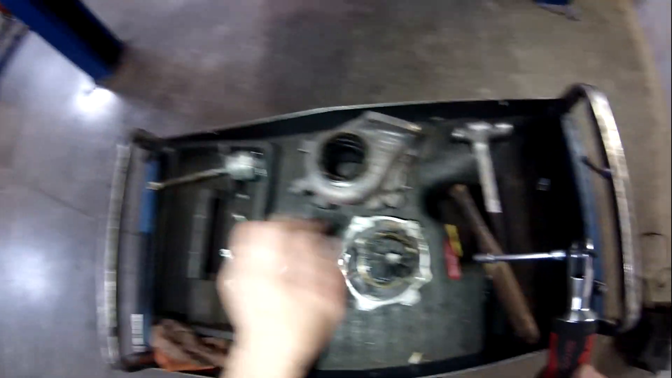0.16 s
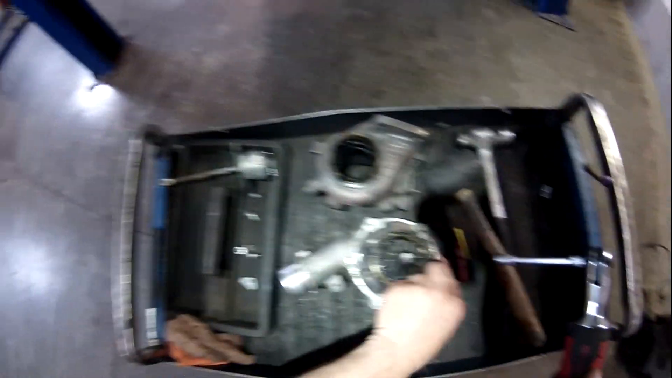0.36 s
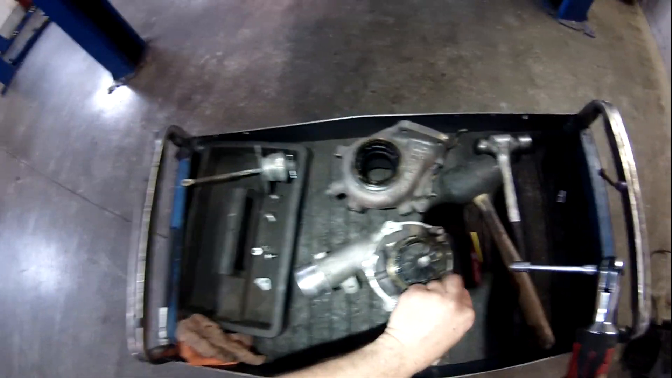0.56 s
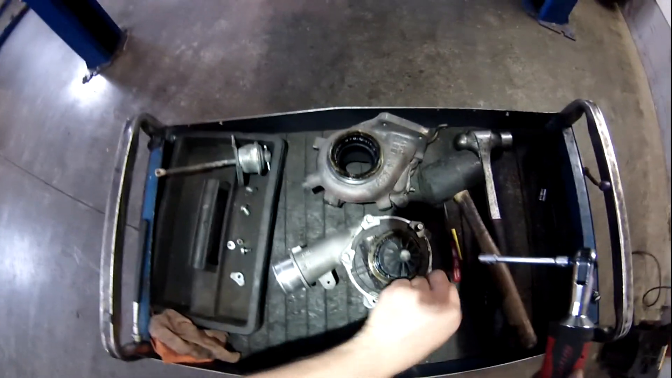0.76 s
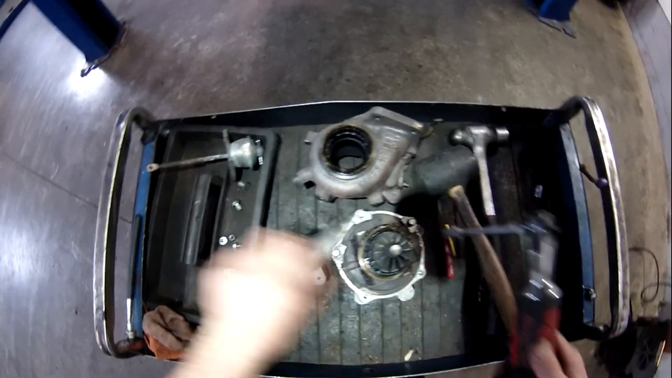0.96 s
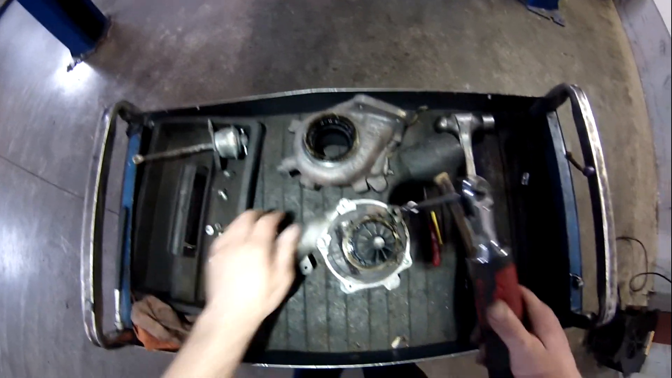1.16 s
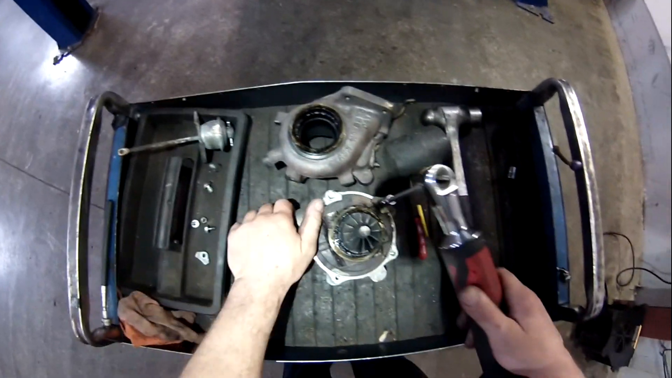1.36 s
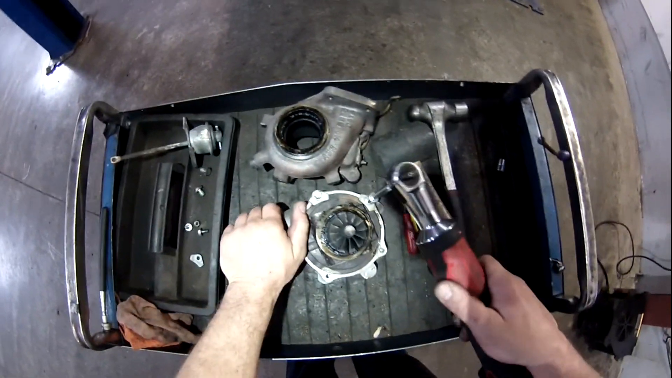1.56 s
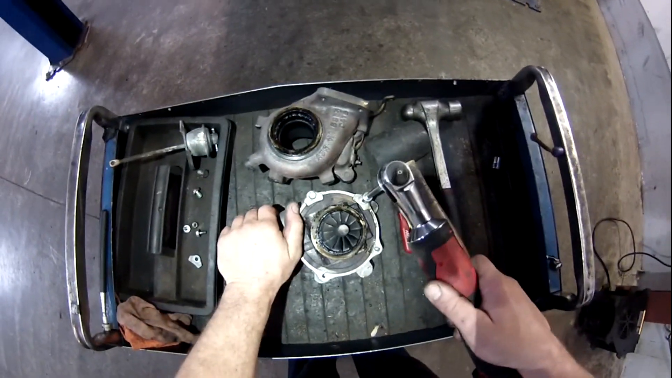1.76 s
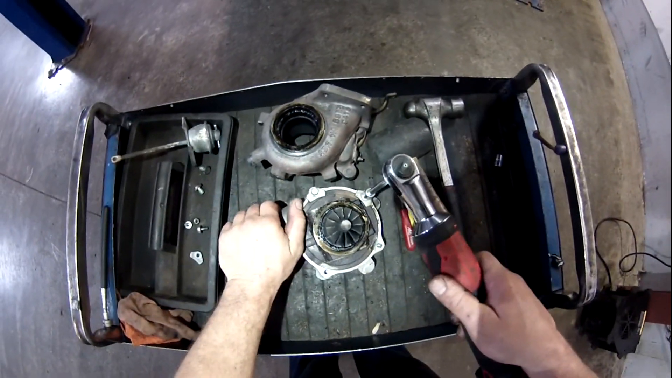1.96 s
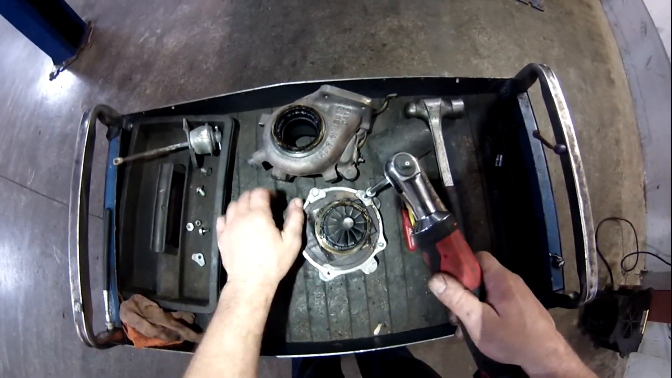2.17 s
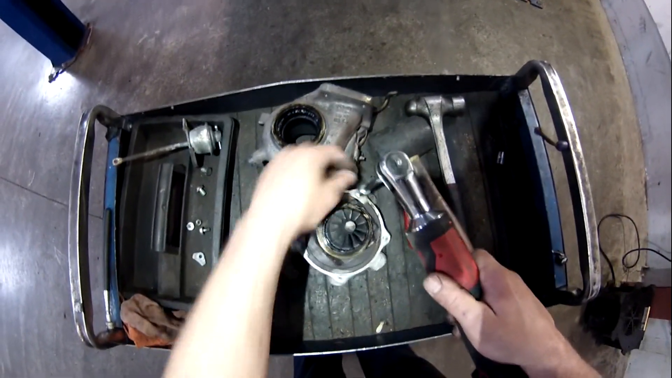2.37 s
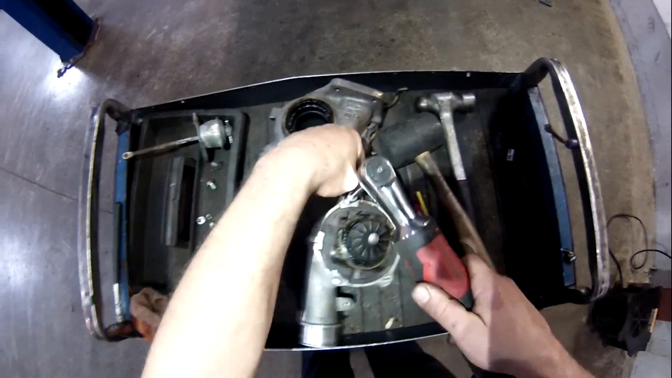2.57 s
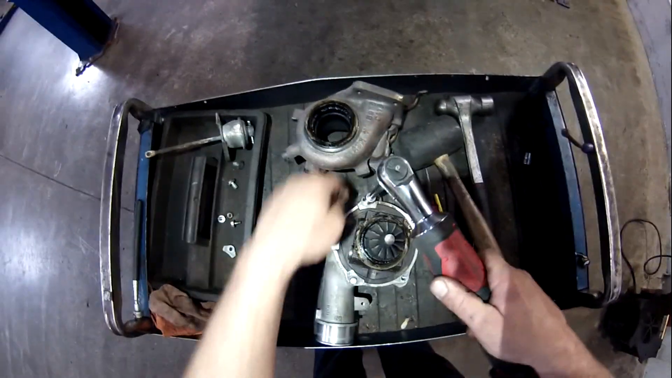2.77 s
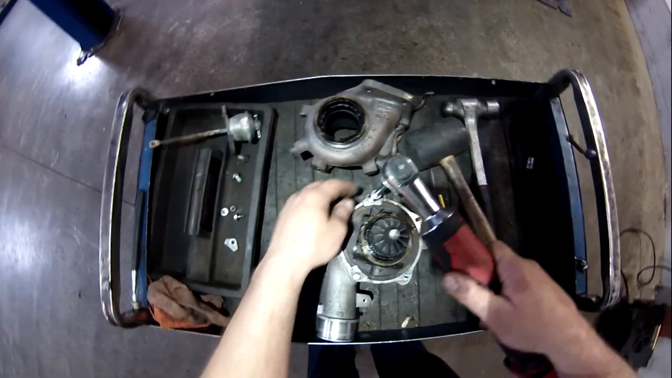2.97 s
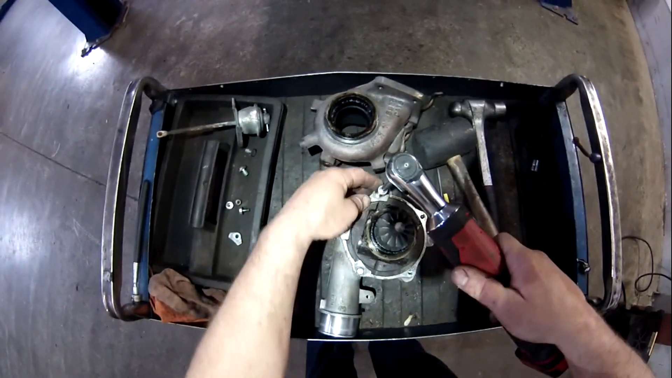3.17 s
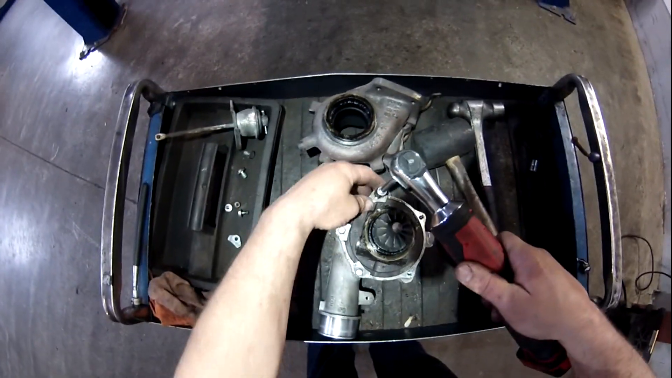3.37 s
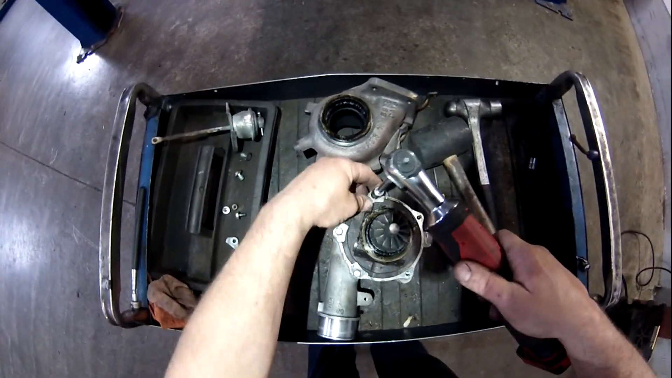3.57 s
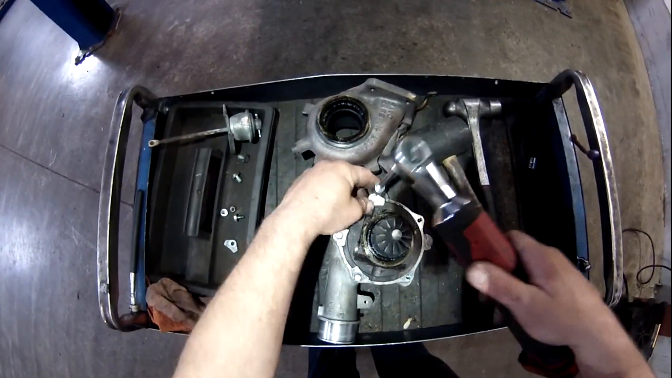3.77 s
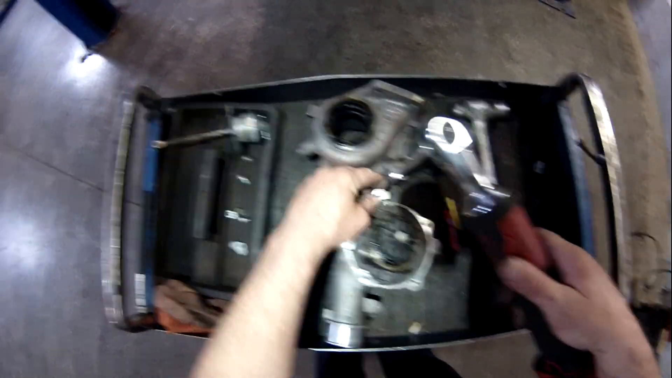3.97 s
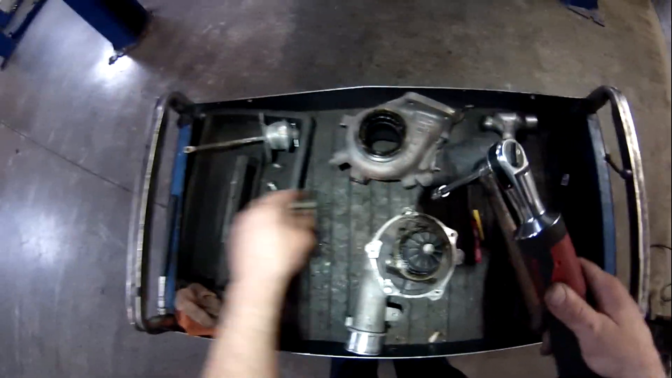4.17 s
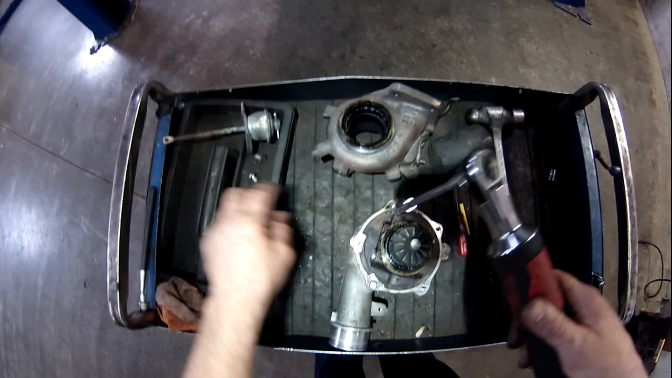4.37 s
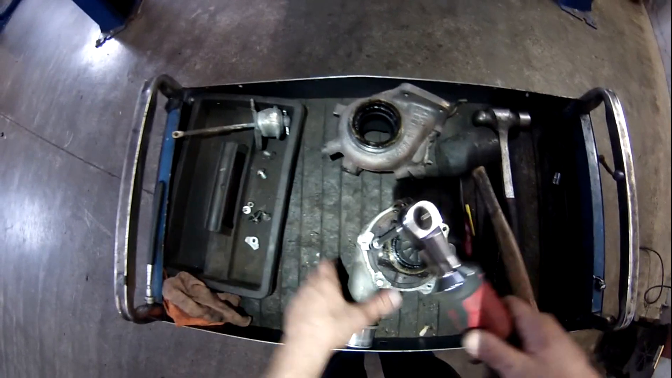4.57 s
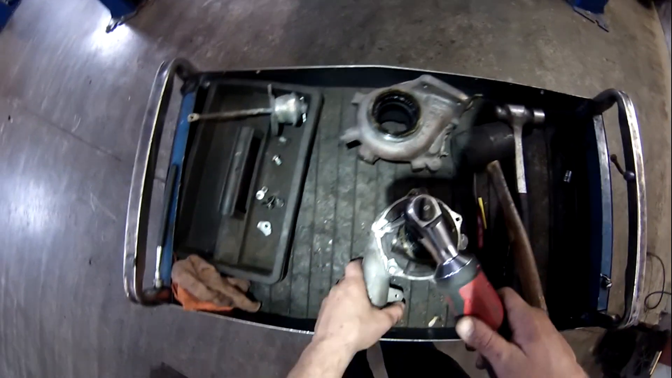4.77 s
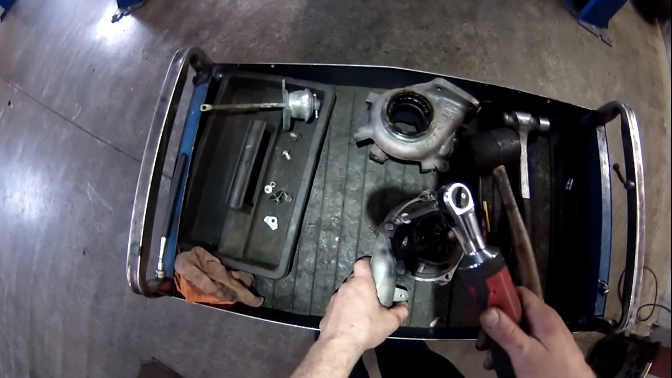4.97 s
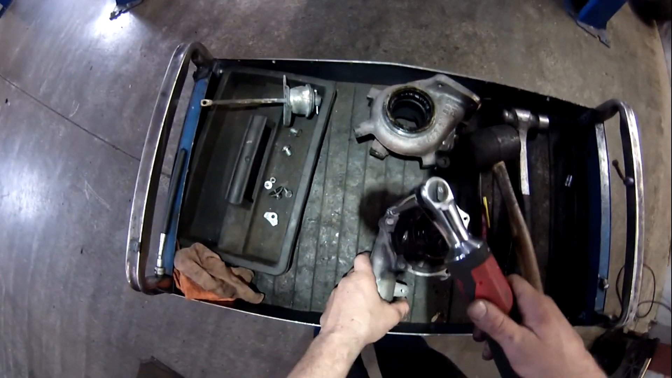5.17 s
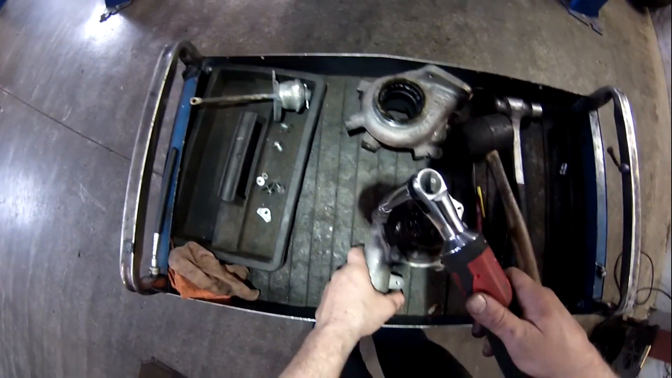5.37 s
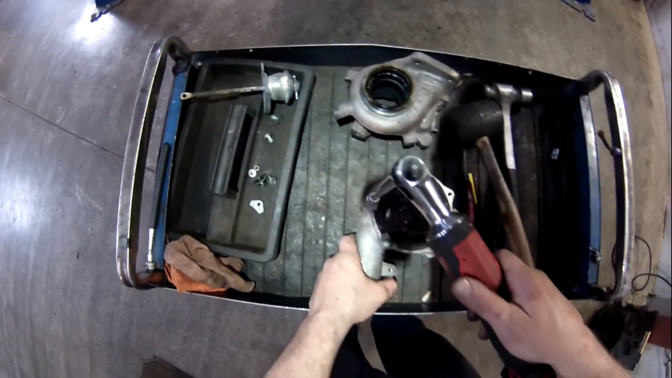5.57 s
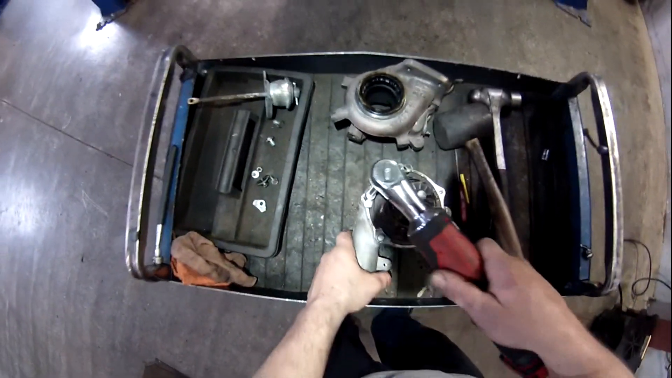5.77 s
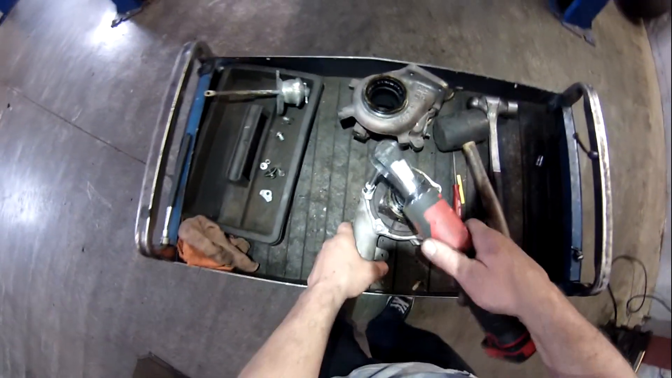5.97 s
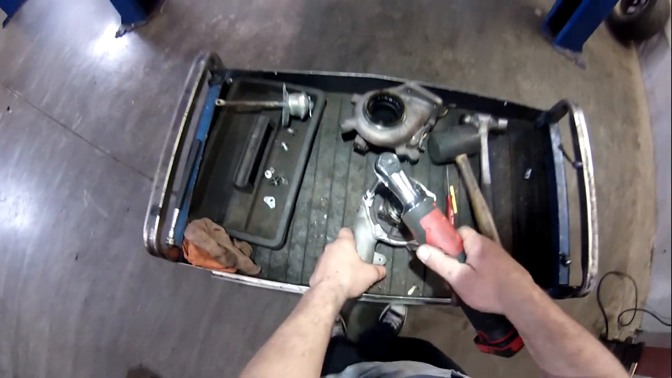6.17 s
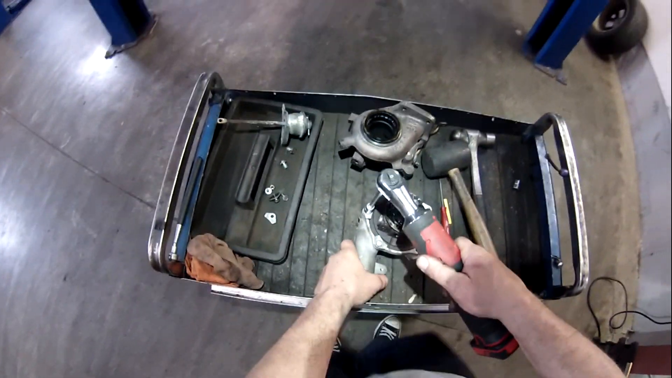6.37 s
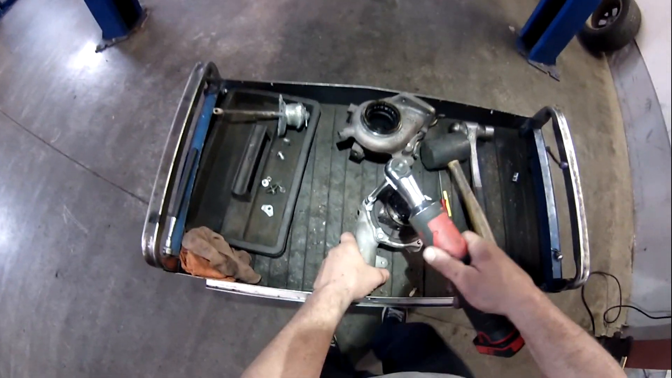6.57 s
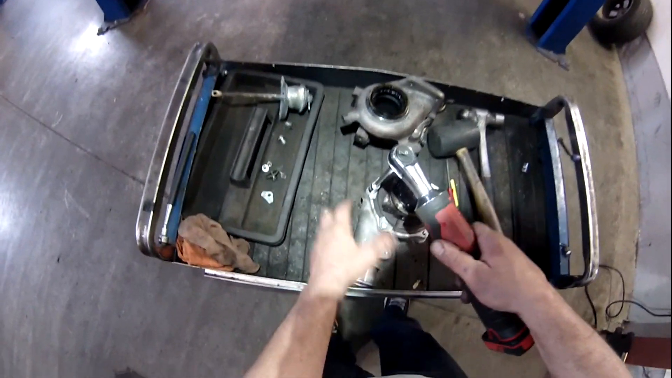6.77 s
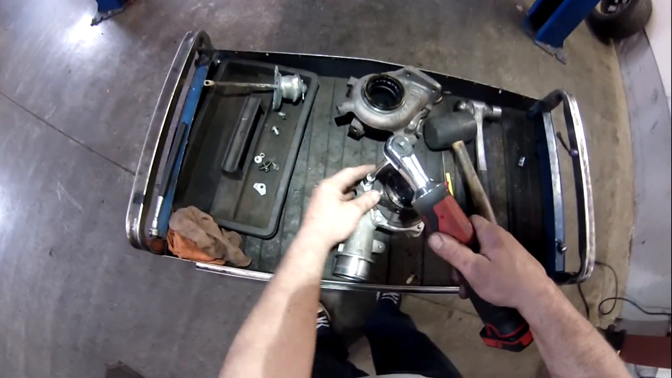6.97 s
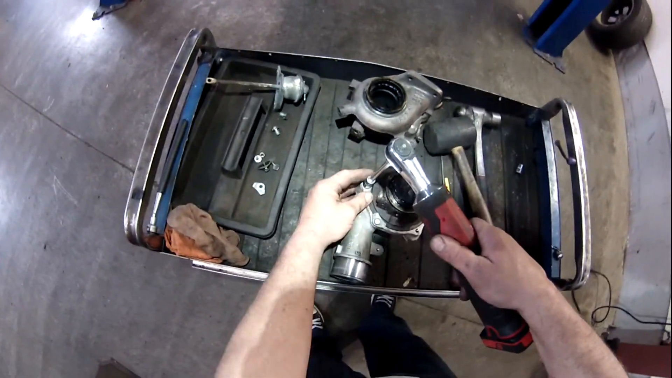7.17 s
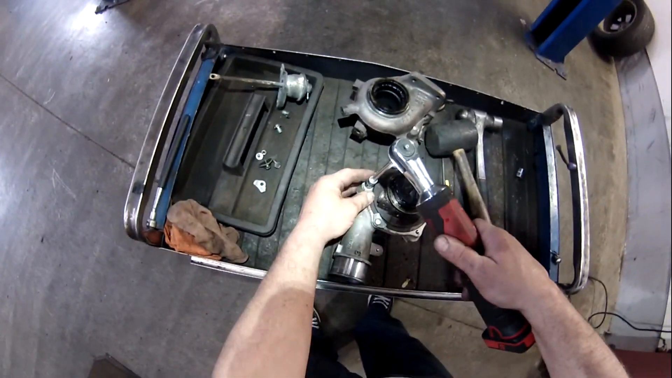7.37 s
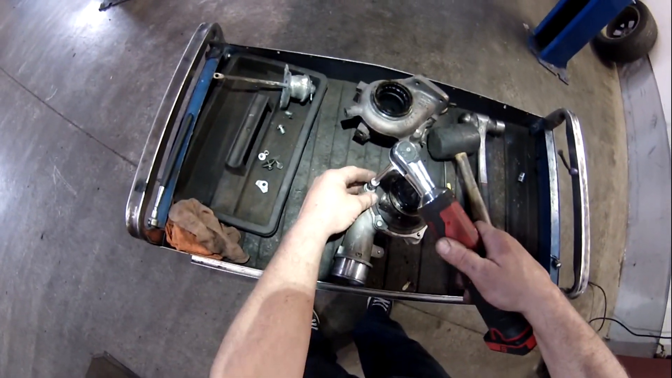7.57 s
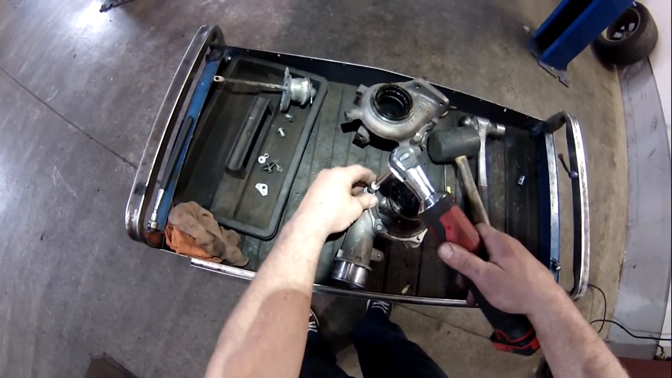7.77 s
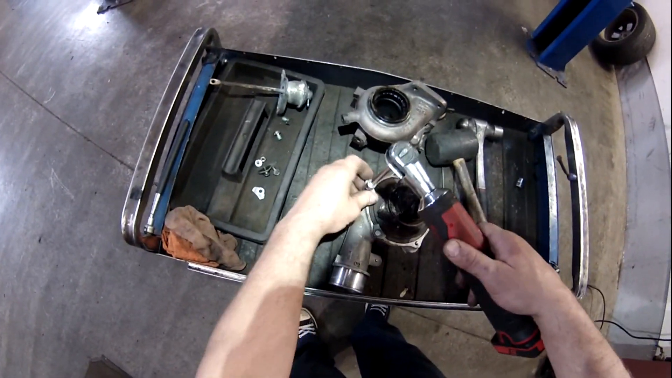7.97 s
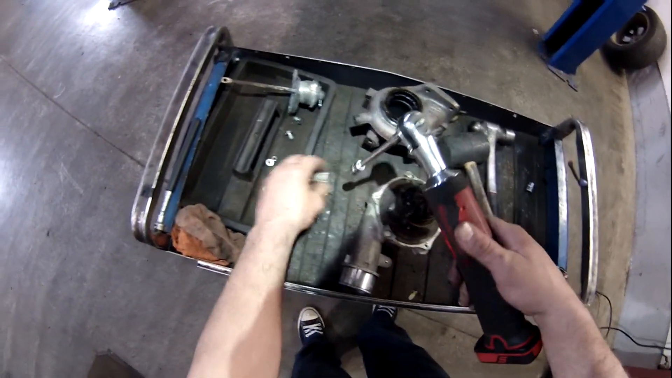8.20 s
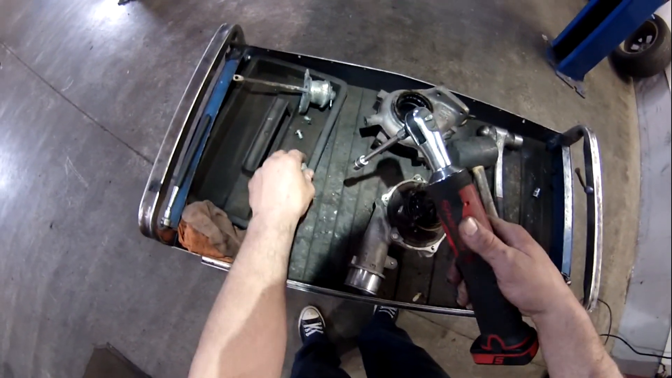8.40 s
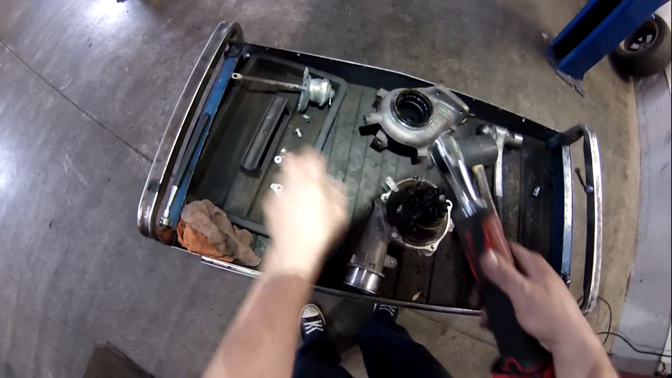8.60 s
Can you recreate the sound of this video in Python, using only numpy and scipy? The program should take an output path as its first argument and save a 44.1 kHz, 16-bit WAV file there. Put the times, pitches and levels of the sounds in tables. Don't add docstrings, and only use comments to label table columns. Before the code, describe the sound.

Two rasping bursts of a power ratchet, each about two seconds, with bolt drops, casting knocks and a socket clink over airy shop ventilation.

```python
import sys
import numpy as np
from scipy import signal
from scipy.fft import rfft, irfft
from scipy.io import wavfile
from scipy.ndimage import uniform_filter1d

SR = 44100
rng = np.random.default_rng(int(sys.argv[2]) if len(sys.argv) > 2 else 0)


def gain_from_decibels(decibels):
    exponent = np.asarray(decibels, float) / 20
    return 10 ** exponent


def wav_out(sig):
    wavfile.write(sys.argv[1], SR, np.round(np.clip(np.atleast_2d(sig).T, -1, 1) * 32767).astype(np.int16))


N = 381024


def level(x, db):
    return x * gain_from_decibels(db) / np.sqrt(np.mean(x ** 2))


def noise():
    return rng.standard_normal(N)


def band(x, lo_hz, hi_hz):
    return signal.sosfilt(signal.butter(2, (lo_hz, hi_hz), "band", fs=SR, output="sos"), x)


def wander(rate):
    hold = int(SR / rate)
    steps = np.repeat(rng.standard_normal(N // hold + 1), hold)
    return uniform_filter1d(steps, hold)[:N] * 1.38


def resonate(x, modes, shift_db=0):
    out = 0
    for k, (hz, width, db) in enumerate(modes):
        gain = gain_from_decibels(db + shift_db * wander(12))
        out = out + (-1) ** k * gain * signal.lfilter(*signal.iirpeak(hz, hz / width, SR), x)
    return out


def colour(x, points):
    hz, db = np.transpose(points)
    grid = np.log(np.arange(1, 4098) * SR / 8192)
    cepstrum = irfft(np.interp(grid, np.log(hz), db) * np.log(10) / 20)
    cepstrum[1:4096] *= 2
    cepstrum[4097:] = 0
    return signal.fftconvolve(x, irfft(np.exp(rfft(cepstrum))))[:len(x)]


def knocks(turns, db, scatter_db, jitter_s):
    at = np.flatnonzero(np.diff(np.floor(turns)) > 0)
    late, strength = rng.standard_normal((N // 50, 2))[:len(at)].T
    place = np.clip(at + (jitter_s * SR * late).astype(int), 0, N - 1)
    out = np.zeros(N)
    np.add.at(out, place, gain_from_decibels(db[at] + scatter_db * np.clip(strength, -9, 1.6)))
    return out


def swell(pulses, rise_s, fall_s):
    t = np.arange(600) / SR
    return signal.fftconvolve(pulses, (1 - np.exp(-t / rise_s)) * np.exp(-t / fall_s))[:N]


# (time [s], crank speed [turns/s])
CRANK_SPEED = [
    [(1.685, 10.2), (1.721, 63.35), (1.867, 83.52), (2.235, 81.06), (2.688, 77.42), (3.047, 82.48),
     (3.164, 86.17), (3.571, 87.67), (3.76, 81.5)],
    [(5.966, 51.78), (6.207, 82.97), (6.345, 75.42), (6.424, 81.13), (6.635, 79.57), (7.109, 85.43),
     (7.381, 86.85), (7.749, 86.77), (7.926, 56.09)],
]
STRIKE_TIMES = (2.5718, 5.973)


def crank_turns(t):
    pulls = []
    for speed, strike_s in zip(CRANK_SPEED, STRIKE_TIMES):
        turns = np.cumsum(np.interp(t, *np.transpose(speed))) / SR
        pulls.append(turns - turns[int(strike_s * SR)])
    return np.where(t < 5, *pulls) + .03 * wander(11)


# (time [s], level [dB])
TRIGGER = [
    [(1.685, -35.5), (1.705, -15), (1.75, -10.5), (1.81, -8), (3.0, -8.5), (3.69, -9), (3.73, -11.5),
     (3.75, -40)],
    [(5.966, -45), (5.976, -20), (6.01, -21), (6.1, -8.5), (6.7, -9), (7.75, -9.5), (7.88, -12.5),
     (7.92, -25)],
]
# (thread binds hardest [s], bolt lets go [s])
BOLTS = [
    (2.47, 2.76),
    (6.578, 6.72),
]


def controls(t, turns):
    effort_db = np.interp(t, *np.vstack(TRIGGER).T)
    binds_s, lets_go_s = np.array(BOLTS)[(t > 5).astype(int)].T
    crank_turns_per_socket_turn = 18.9
    since_bind = turns - turns[(binds_s * SR).astype(int)]
    bind = np.cos(2 * np.pi * since_bind / crank_turns_per_socket_turn)
    free = np.clip((uniform_filter1d(np.gradient(turns) * SR, SR // 8) - 82) / 4, 0, 1)
    loose_s = np.clip(t - lets_go_s, 0, 2)
    shake_db = effort_db - 28 + 3 * bind - 12 * np.minimum(loose_s / .05, 1) - 5 * loose_s
    return_db = -6 + 1.5 * bind - 7 * free
    hum_db = -10 + 1.5 * wander(8)
    strike_db = -0.8 + 1.2 * wander(7.9)
    return effort_db, hum_db, shake_db, return_db, strike_db, free


def pawl_strikes(turns, return_db):
    drive = knocks(turns, np.zeros(N), scatter_db=1.6, jitter_s=.0003)
    back = knocks(turns - .44, return_db - 5.5, scatter_db=7.0, jitter_s=0.00099)
    return level(swell(drive + back, .001, .001), 2.5)


HEAD_SHIFT_DB = 0.6
# (pitch [Hz], width [Hz], level [dB])
HEAD_MODES = [(2376, 785, -2.5), (3206, 586, 4.5), (3539, 757, 4.5), (4540, 1330, 2), (7260, 1740, 3),
              (12800, 5900, -11)]


def ratchet_head(turns, strikes):
    teeth = knocks(11 * turns, np.zeros(N), scatter_db=4, jitter_s=.0003)
    slack = gain_from_decibels(-5 * np.exp(-((turns % 1 - .31) / .09) ** 2))
    rasp = slack * (level(swell(teeth, .0002, .0005), -4) + .6)
    contacts = strikes * np.sign(noise())
    head = resonate(contacts + rasp * noise(), HEAD_MODES, HEAD_SHIFT_DB)
    return head / np.sqrt(uniform_filter1d(head ** 2, SR // 10))


# (pitch [Hz], width [Hz], level [dB])
HUM_MODES = [(407, 140, -8), (496, 58, 6), (710, 190, 0), (873, 180, 0.5), (930, 68, 6), (1059, 71, 1.5),
             (1218, 130, 2.5), (1630, 670, -2.5)]


def casting_hum(turns, return_db, strikes):
    forth = knocks(turns, 3 * wander(9), scatter_db=2.5, jitter_s=6e-5)
    back = knocks(turns - .46, return_db + 6 + 3 * wander(9), scatter_db=2.5, jitter_s=6e-5)
    rough = (level(strikes, -6) + .7) * noise()
    push = level(forth - back, 0) + level(rough, -1.5)
    return level(resonate(push, HUM_MODES, HEAD_SHIFT_DB), 0)


# (multiple of crank speed, level under load [dB], level running free [dB])
WHINE_TONES = [(5, -16, -30.5), (6, -11, -4.5)]


def motor_whine(turns, free):
    whine = 0
    for multiple, load_db, free_db in WHINE_TONES:
        gain = gain_from_decibels(load_db + (free_db - load_db) * free + 2 * wander(12))
        whine = whine + gain * np.sin(2 * np.pi * multiple * turns)
    return band(whine, 430, 1500)


def cart_shake(turns):
    twice = gain_from_decibels(-3.0 + 3 * wander(10)) * np.sin(4 * np.pi * turns)
    return np.sqrt(2) * np.sin(2 * np.pi * turns) + twice


def ratchet():
    t = np.arange(N) / SR
    on = sum((t > pull[0][0]) & (t < pull[-1][0]) for pull in TRIGGER)
    turns = crank_turns(t)
    effort_db, hum_db, shake_db, return_db, strike_db, free = controls(t, turns)
    strikes = pawl_strikes(turns, return_db) * gain_from_decibels(strike_db)
    head = ratchet_head(turns, strikes)
    hum = casting_hum(turns, return_db, strikes) + motor_whine(turns, free)
    rumble = level(band(noise(), 120, 300), -35.0) * gain_from_decibels(1.0 * wander(18))
    tool = gain_from_decibels(effort_db + 0.5) * (head + rumble + gain_from_decibels(hum_db - 3.5) * hum)
    return on * (tool + gain_from_decibels(shake_db) * cart_shake(turns))


def hits(rows, modes, low_hz, detune, rattle_db, ring_db, ms):
    out, t = np.zeros(N + SR), np.arange(SR // 3) / SR
    contact_ms = max(ms, .3)
    touch = np.exp(-t / (contact_ms / 1000)) * (1 - np.exp(-t / .0003))
    for s, db, low_db, high_db in rows:
        rough = rng.standard_normal((3, len(t)))
        place = rng.standard_normal((len(modes), 2))
        rattled = rough * (touch + gain_from_decibels(rattle_db) * np.exp(-t / 0.013))
        low = band(rattled[0], low_hz, 1500)
        mid = band(rattled[1], 2000, 4600)
        high = band(rough[2] * touch, 6700, 13000)
        crack = level(low, low_db + 22.5) + level(mid, 0) + level(high, high_db + 26.0)
        ring = np.zeros(len(t))
        for (hz, mode_db, t60), (p, q) in zip(modes, place):
            gain = gain_from_decibels(mode_db + 2 * p + (low_db + 13) * (hz < 1500))
            tone = np.sin(2 * np.pi * hz * (1 + detune * q) * t + 9 * p)
            ring += gain * tone * 1000. ** (-t / t60)
        ring *= 1 - np.exp(-t / (contact_ms / 2500))
        sound = crack / np.abs(crack).max() + gain_from_decibels(ring_db) * ring / np.abs(ring).max()
        start = int(s * SR)
        out[start:start + len(t)] += gain_from_decibels(db) * sound / np.abs(sound).max()
    return out[:N]


# (time [s], peak level [dB], low part [dB], high part [dB])
BOLT_HITS = [(0.104, -41, -2, -24), (0.159, 6, -21.5, -18), (0.264, -10, -9, -12.5),
             (0.294, -20, -3.5, -13), (0.4, -29, -16, -19.5), (0.436, -13.5, -18, -19.5),
             (0.488, -41, -15, -18), (0.574, -41, -12, -28), (4.397, 0, -31.5, -27),
             (4.404, -2.5, -22, -20), (4.41, 4.5, -17.5, -13), (4.469, -26, -1, -15),
             (4.533, -15.5, -17.5, -19), (8.368, -27, -15, -8)]
# (pitch [Hz], level [dB], time to fade 60 dB [s])
TRAY_MODES = [(710, 2, .035), (1200, -5, .016), (1650, -3, .016), (2000, -4, .014), (2330, 0, .018),
              (2650, -4, .014), (2950, -5, .014), (3400, -4, .016), (4300, -7, .012)]


def bolts_in_tray():
    return hits(BOLT_HITS, TRAY_MODES, low_hz=544, detune=0.037, rattle_db=-11.5, ring_db=-2.6, ms=3.7)


# (time [s], peak level [dB], low part [dB], high part [dB])
CASTING_HITS = [
    (1.205, 9, -15, -18),
    (1.294, -2, -8, -15.5),
    (1.322, -14.5, -2.5, -19.5),
    (1.359, -9, -11.5, -9.5),
    (1.427, -19.5, -16.5, -18.5),
    (1.512, -18, 7, -22.5),
    (5.814, -35, -3, -16),
]
# (pitch [Hz], level [dB], time to fade 60 dB [s])
CASTING_MODES = [(190, -10, .07), (400, -7, .04), (668, -1, .04), (958, 0, .045), (1300, -3, .025),
                 (1700, -2, .025), (2100, -4, .025), (2800, -6, .02), (3510, -8, .02)]


def casting_knocks():
    return hits(CASTING_HITS, CASTING_MODES, low_hz=200, detune=0.091, rattle_db=-14.5, ring_db=-3, ms=5.1)


# (time [s], peak level [dB], low part [dB], high part [dB])
NUT_HITS = [
    (8.215, -28.5, -21, -32),
    (8.433, -18.5, -11, -36),
]
# (pitch [Hz], level [dB], time to fade 60 dB [s])
NUT_MODES = [(759, -10, 0.033), (1215, -2, 0.024), (1475, -8, .025), (1574, -4, .02), (1960, -2, .016)]


def nut_knocks():
    return hits(NUT_HITS, NUT_MODES, low_hz=910, detune=0.01, rattle_db=-12, ring_db=1, ms=3)


# (time [s], peak level [dB], low part [dB], high part [dB])
SOCKET_HITS = [
    (4.769, -7.5, -30, -21),
    (4.797, -17.5, -22, -25),
]
# (pitch [Hz], level [dB], time to fade 60 dB [s])
SOCKET_MODES = [(2196, -4, .04), (3397, -1, .06), (3420, -17, .22), (4377, -10, .05), (5480, 4, .08),
                (5500, -13, .35), (6525, 5, .08), (6548, -13, .3), (8603, -6, .08)]


def socket_clinks():
    return hits(SOCKET_HITS, SOCKET_MODES, low_hz=400, detune=0, rattle_db=-13.0, ring_db=-6, ms=2.4)


# (time [s], peak level [dB], low part [dB], high part [dB])
TICKS = [(1.695, -3.5, -25, -17.5), (1.717, 1, -18, -20), (1.736, 0, -24.5, -10.5), (4.817, -24, -8, -4),
         (4.959, -36, -18, -11), (5.025, -26.5, -20, -17), (5.142, -13, -32, -21), (5.174, -21, -21, -19.5),
         (5.267, -31, -12, -12), (5.313, -41, -11, -9), (5.343, -24.5, -21, -16), (5.54, -25, -15.5, -16.5),
         (5.557, -27.5, -14, -18.5), (5.873, -19, -20, -19), (5.884, -31, -14, -6),
         (5.972, -13.5, -18, -18.5), (6.009, -9, -12, -13), (6.091, 2, -15.5, -17), (8.175, -25, -24, -17)]
# (pitch [Hz], level [dB], time to fade 60 dB [s])
TICK_CASE_MODES = [(2100, -3, .025), (3450, -2, .03), (4650, 0, .02), (7400, -3, .015), (8600, -5, .025)]


def pawl_ticks():
    return hits(TICKS, TICK_CASE_MODES, low_hz=406, detune=0.054, rattle_db=-9.5, ring_db=-9.5, ms=2.7)


# (time [s], peak level [dB], low part [dB])
CART_HITS = [(1.335, -14, 2.5), (2.57, -16, -8), (2.655, 4.5, -11), (2.687, -8.5, 4), (2.712, -4, -7),
             (2.979, -21.5, -6.5), (3.057, -22, 7.5), (3.089, -18, 1.5), (6.045, -16, -2),
             (6.083, -13.5, 3.5), (6.201, -7.5, -3), (6.249, -16.5, -6), (6.638, -17.5, -5),
             (6.723, -26, -1), (7.216, -30.5, 6.5), (7.4, -23.5, 5), (7.759, -30, 6)]
# (pitch [Hz], level [dB], time to fade 60 dB [s])
CART_MODES = [(112, 2.5, 0.062), (166, -2.5, 0.051), (280, -4, 0.11), (439, -5, 0.15), (656, -3.5, 0.13),
              (946, -6.5, 0.065), (1180, -3.5, .04)]


def cart_thuds():
    rows = [(*row, -27.5) for row in CART_HITS]
    sound = hits(rows, CART_MODES, low_hz=90, detune=0.066, rattle_db=-4, ring_db=0.5, ms=5.5)
    return band(sound, 64, 3200)


# (middle time [s], length [s], level [dB], pitch centre [Hz])
SCRAPES = [
    (1.53, 0.032, -43, 4830),
    (2.687, 0.096, -18, 332),
    (4.442, 0.041, -48, 2200),
    (4.554, 0.046, -40.5, 1470),
    (5.162, 0.04, -35, 500),
    (8.385, 0.07, -44, 1000),
]


def scrapes():
    out = np.zeros(N)
    t = np.arange(-SR // 8, SR // 8) / SR
    for s, length, db, hz in SCRAPES:
        friction = rng.standard_normal(len(t))
        grains_db = 2.5 * rng.standard_normal(len(t) // 100 + 1).repeat(100)[:len(t)]
        drag = level(band(friction * gain_from_decibels(grains_db), hz / 1.9, hz * 1.6), 0)
        start = int(s * SR) - SR // 8 - 1
        out[start:][:len(t)] += gain_from_decibels(db) * np.exp(-(2 * t / length) ** 2) * drag
    return out


# (pitch [Hz], time to fade 60 dB [s], level [dB])
HALL_BANDS = [(300, 0.8, -18.5), (1000, 0.67, -19), (2550, 0.89, -19.5), (6000, 1, -20),
              (12000, 0.53, -15.5)]


def hall(x):
    t = np.arange(int(1.5 * SR)) / SR
    tail = 0
    for hz, t60, db in HALL_BANDS:
        wash = band(rng.standard_normal(len(t)), hz / 1.47, hz * 1.58)
        tail = tail + gain_from_decibels(db) * wash * 1000. ** (-t / t60)
    tail = tail * (1 - np.exp(-t / 0.0047))
    near = gain_from_decibels(-5) * rng.standard_normal(len(t)) * np.exp(-t / 0.025)
    return signal.fftconvolve(x, (tail + near) * gain_from_decibels(-34.0))[:N]


# (pitch [Hz], level [dB])
CASE_TONE = [(30, -1), (300, -4.5), (2000, 1.5), (4600, 2), (5300, -1), (6000, -11), (6600, -6.5),
             (7450, -4.5), (8500, -5), (10000, -8.5), (12000, -32.5), (13500, -12.5), (15000, 5),
             (15250, 2.5)]


def camera_case(x):
    return colour(x, CASE_TONE)


# (pitch [Hz], level per Hz [dB])
AIR_TONE = [(12, -25), (20, -11.5), (74, -6), (109, -12), (207, -17.5), (232, -16.5), (393, -20.5),
            (597, -22.5), (649, -23), (1230, -26.5), (1340, -31.5), (1500, -27.5), (6020, -41.5),
            (11700, -44.5), (15500, -48.5)]
# (pitch [Hz], level [dB])
FAN_LINES = [(107.7, -55.5), (242.2, -64.5), (360.7, -66.5), (597.5, -65), (1200, -71)]


def shop():
    t = np.arange(N) / SR
    air = level(colour(noise(), AIR_TONE), -48.5) * gain_from_decibels(1.0 * wander(2.9))
    air = air - resonate(air, [(6020, 730, 1.4)])
    lines = 0
    for hz, db in FAN_LINES:
        gain = gain_from_decibels(db + 3.5 + 2.0 * wander(2.7))
        lines = lines + gain * np.sin(2 * np.pi * hz * t + 1.1 * wander(2.6))
    return air + lines


def scene():
    drops = bolts_in_tray() + casting_knocks() + nut_knocks()
    steel = socket_clinks() + pawl_ticks()
    close = ratchet() + drops + steel + cart_thuds() + scrapes()
    return (camera_case(close + hall(close)) + shop())[None]


def top_cut(x):
    return signal.sosfilt(signal.butter(12, 16600, fs=SR, output="sos"), x)


def record(dry):
    x = signal.sosfilt(signal.ellip(10, .3, 60, 15330, fs=SR, output="sos"), dry)
    mix = np.clip(x, -.99, .99)
    return top_cut(mix)


dry = scene()
out = record(dry)
wav_out(out)
```